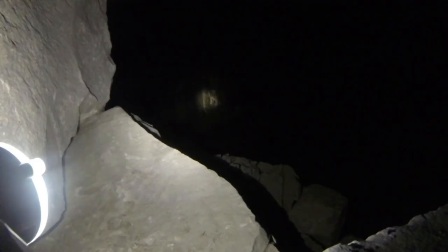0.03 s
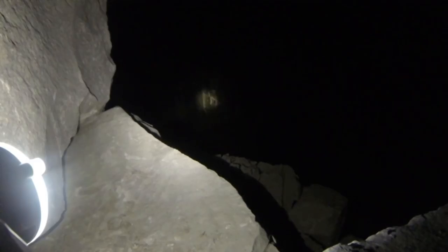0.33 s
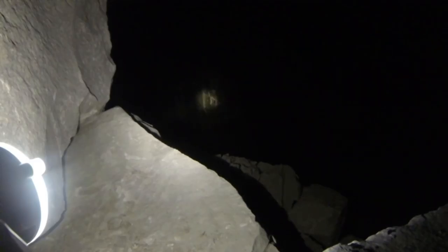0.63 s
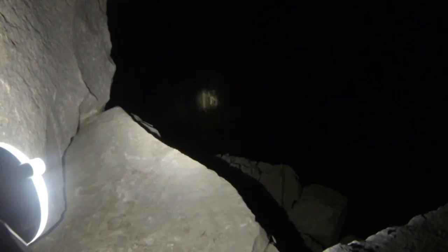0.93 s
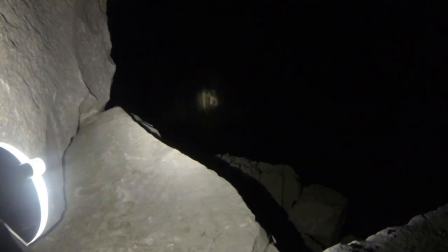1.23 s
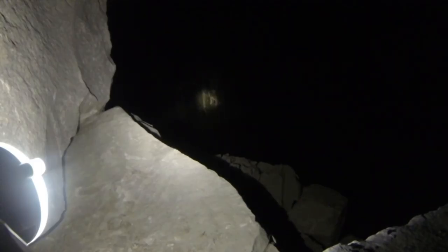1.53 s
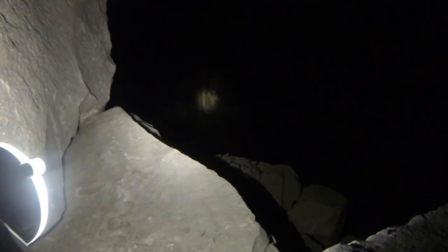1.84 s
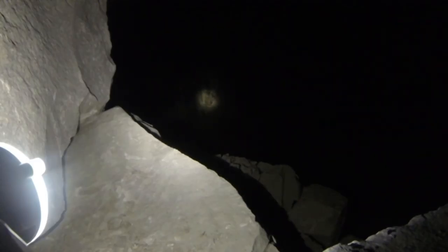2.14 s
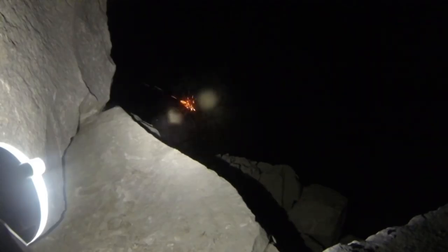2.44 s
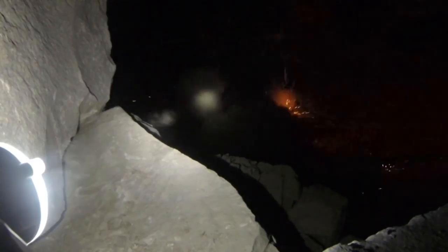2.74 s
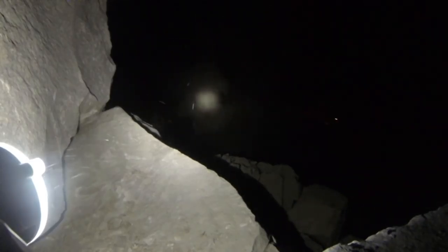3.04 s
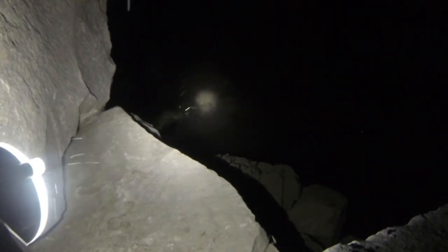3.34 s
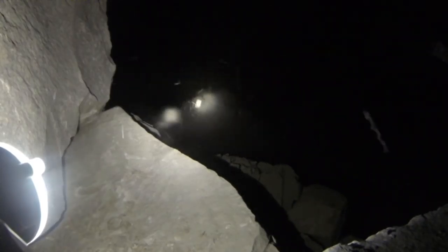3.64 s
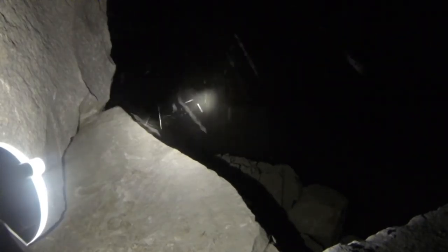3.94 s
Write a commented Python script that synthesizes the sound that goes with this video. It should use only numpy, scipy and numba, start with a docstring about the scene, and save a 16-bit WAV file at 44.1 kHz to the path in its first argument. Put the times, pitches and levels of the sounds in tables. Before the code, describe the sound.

After near silence, a quick string of blasting charges cracks and booms through a rock tunnel.

```python
"""A round of delayed charges fired in a rock tunnel, heard from a camera in a housing behind boulders.
Out of still air, each charge sends a pressure front, a crack of wall reflections, a boom and a long tail.
The rock heaves and rumbles, loose rock knocks, and the tunnel rings low just after some charges.
Gas and broken rock rush out of the face, fragments strike the housing, and the recorder limits and clips."""
import sys
import numpy as np
from scipy import signal
from scipy.fft import rfft, irfft
from scipy.io import wavfile
from scipy.ndimage import uniform_filter1d
from numba import njit

SR = 44100
rng = np.random.default_rng(int(sys.argv[2]) if len(sys.argv) > 2 else 0)


def log_audio(samples):
    """Write samples as a 16-bit WAV file to the path given in sys.argv[1]."""
    # one column per channel
    frames = np.atleast_2d(samples).T
    # limit to full scale, then quantise
    limited = np.clip(frames, -1, 1)
    pcm = np.round(limited * 32767).astype(np.int16)
    wavfile.write(sys.argv[1], SR, pcm)


N = 176400
T = np.arange(N) / SR
AIR_DB = -4  # trim on the tunnel's echoes and the hiss of the gas
KNOCK_RISE_S, TOP_HZ = 0.002, 15300  # attack of clatters, low rings and jolts; top of the recorder's band


def undb(db):
    """Decibels to gain."""
    return 10 ** (np.asarray(db) / 20)


def unit(x):
    """Scale to rms 1."""
    return x / np.sqrt(np.mean(x ** 2))


def colour(x, spectrum):
    """Shape by a spectrum that rolls off past both ends, at rms 1."""
    hz, db = np.array(spectrum).T
    f = np.maximum(np.arange(N // 2 + 1) * SR / N, 1)
    rolloff = np.minimum(hz[-1] / f, 1) ** 2 * np.minimum(f / hz[0], 1)
    gain = undb(np.interp(np.log(f), np.log(hz), db))
    return unit(irfft(rfft(x) * rolloff * gain, N))


def noise(spectrum):
    """Noise with the given spectrum."""
    return colour(rng.standard_normal(N), spectrum)


def steady(x, span_s):
    """Even out the slow swells of a noise."""
    return x / np.sqrt(uniform_filter1d(x ** 2, max(int(span_s * SR), 2)) + 1e-9)


def burst(start_s, rise_s, fall_s):
    """Fast attack and exponential release."""
    age = np.maximum(T - start_s, 0)
    return (1 - np.exp(-age / rise_s)) * np.exp(-np.minimum(age / fall_s, 50))


# Room tone and hiss at the microphone: freq_hz, level_db
ROOM_TONE = [(20, 0), (60, -3), (150, -6), (400, -13), (1000, -17), (2300, -22), (3800, -24.5), (8000, -30),
             (12000, -33.5), (16000, -33)]
# Faint whine inside the camera: pitch_hz, level_db, pulse_depth (0-1)
WHINE_TONES = [(8420, -85.5, .95), (14745, -86, .55)]

def air_and_electronics(pulse_hz=62.5, buzz_hz=3030, buzz_width_hz=170, start_s=0.065):
    """Still tunnel air, with the hiss, pulsing whine and buzz of the electronics."""
    pulse = .5 + .5 * np.cos(2 * np.pi * pulse_hz * T)
    whine = 0
    for hz, db, depth in WHINE_TONES:
        flutter = unit(1 - depth + depth * pulse ** 2)
        whine += undb(db) * np.sqrt(2) * flutter * np.sin(2 * np.pi * hz * T)
    resonance = signal.iirpeak(buzz_hz, buzz_hz / buzz_width_hz, fs=SR)
    band = signal.lfilter(*resonance, rng.standard_normal(N))
    buzz = undb(-77) * unit(band * (2 * pulse - 1) ** 2)  # swells twice per pulse
    fade_in = np.clip((T - start_s) / .005, 0, 1)
    return (undb(-66) * noise(ROOM_TONE) + whine + buzz) * fade_in


# Course of the deep rumble filling the tunnel: time_s, level_db
RUMBLE_LEVELS = [(1.45, -89), (1.76, -71), (1.83, -16.5), (1.92, -22), (2.0, -33.5), (2.19, -28),
                 (2.27, -19.5), (2.52, -30.5), (2.63, -21.5), (2.74, -29), (2.87, -21), (3.09, -31.5),
                 (3.2, -19), (3.36, -40.5), (3.45, -30), (3.55, -20.5), (3.71, -36.5), (3.88, -25),
                 (4.0, -32)]
# Its spectrum: freq_hz, level_db
RUMBLE_SPECTRUM = [(12, -22), (28, -0.5), (55, 4), (85, 0), (130, -8.5), (200, -15.5), (330, -24),
                   (700, -63)]
# Shocks reaching the camera through the rock: peak_s, level_db, pitch_hz, swell_s, fall_s
ROCK_SHOCKS = [(1.811, -4.5, 62, 0.012, 0.017), (2.329, -5.5, 60.5, 0.0098, 0.02),
               (2.436, -15, 47.7, 0.011, 0.034), (2.593, -30, 62, 0.014, 0.051),
               (2.779, -14, 46.6, 0.0055, .04), (2.954, -16, 57.6, 0.017, 0.02),
               (3.18, -14.5, 34.7, 0.019, 0.017), (3.778, -13, 43.3, 0.0068, 0.031)]

def heaving_rock():
    """The rock heaves in a few slow cycles, over the rumble of the tunnel's air."""
    rumble_db = np.interp(T, *np.array(RUMBLE_LEVELS).T)
    sound = undb(rumble_db) * steady(noise(RUMBLE_SPECTRUM), span_s=0.05)
    for peak_s, db, hz, swell_s, fall_s in ROCK_SHOCKS:
        age = T - peak_s
        decay = np.where(age < 0, (age / swell_s) ** 2 / 2, age / fall_s)
        sound -= undb(db) * np.cos(2 * np.pi * hz * age) * np.exp(-np.minimum(decay, 50))
    return sound


# Clatters and low rings in the tunnel: start_s, clatter_db, clatter_fall_s, ring_db, ring_hz
CLATTERS_AND_RINGS = [ (1.7965, -34, .007, -50, 150), (1.911, -30, 0.0071, -21.5, 138),
                      (2.022, -32, 0.0076, -18.5, 334), (2.253, -21.5, 0.0087, -16.5, 183),
                      (2.692, -31, 0.0089, -29, 191), (2.786, -45, 0.0076, -23, 196),
                      (2.939, -29, .012, -19, 143), (3.480, -31, .022, -24, 190),
                      (3.638, -29.5, 0.018, -35, 206), (3.870, -41, 0.0093, -29, 170)]
# The clatter at the microphone: freq_hz, level_db
CLATTER_SPECTRUM = [(300, -7), (700, -3), (1300, 0), (2300, -4), (3500, -16), (5000, -30), (8000, -48)]

def clatters_and_rings(ring_fall_s=0.018):
    """Short clatters and hollow low rings: loose rock knocking, the tunnel ringing just after a charge."""
    clatter, sound = noise(CLATTER_SPECTRUM), np.zeros(N)
    for start_s, clatter_db, fall_s, ring_db, hz in CLATTERS_AND_RINGS:
        ring = np.sin(2 * np.pi * hz * (T - start_s))
        sound += undb(clatter_db) * clatter * burst(start_s, KNOCK_RISE_S, fall_s)
        sound += undb(ring_db) * ring * burst(start_s, KNOCK_RISE_S, ring_fall_s)
    return sound


# Wall crack, boom, early echoes and tail, from behind the boulders: freq_hz, level_db
CRACK_SPECTRUM = [(120, -60.5), (350, -1), (1000, 2.5), (2200, -8), (4000, -7), (6500, -22.5),
                  (9000, -27.5), (12500, -42), (15500, -40)]
BOOM_SPECTRUM = [(40, 8), (110, -1), (190, 7.5), (350, -0.5), (600, -4.5), (1500, -57)]
EARLY_SPECTRUM = [(200, -13), (500, 3), (1100, 10), (2200, 1.5), (3500, -4), (7000, -19.5), (10000, -32.5),
                  (15000, -31)]
TAIL_SPECTRUM = [(60, 4), (140, 4), (195, 9.5), (270, 0.5), (550, 2), (1000, -1.5), (1600, -1),
                 (2200, -10.5), (4000, -13.5), (6500, -27), (9000, -36.5), (12500, -40.5), (15000, -45)]
# The round at the face: start_s, front_db, front_ms, crack_db, crack_fall_s, boom_db, tail_db
ROUND = [ (1.817, -15, 2.9, -31, 0.049, -22, -45), (1.8262, -2, 2.2, -12.5, 0.0044, -17, -29),
         (2.0117, -11.5, 0.61, -24.5, 0.0085, -14.5, -40), (2.1224, -15.5, 1.6, -15, 0.014, -10, -25),
         (2.2436, -7.5, 2.9, -16.5, 0.013, -14.5, -31.5), (2.3270, 0, 2.3, 0.5, 0.0033, -16, -26.5),
         (2.5360, -7, 0.47, -10.5, 0.0049, -28, -33.5), (2.5854, -1.5, 4.6, -24.5, 0.002, -19.5, -54),
         (2.829, -2.5, 1.74, -11.5, 0.0031, -25, -30), (3.1462, -7.5, 2.8, -37.5, .008, -26.5, -39),
         (3.5108, 1.5, 1.45, -4, 0.0047, -21, -29.5), (3.5376, -3.5, 1.3, -12.5, 0.0057, -44, -52),
         (3.9022, -19.5, 0.66, -12, 0.0012, -11.5, -51), (3.9071, 5, 1.76, -2, 0.0035, -16, -29),
         (3.9905, -3.5, 3.5, -11.5, 0.0017, -10.5, -35)]

def charges(suction_damping=2.3, base_edge_hz=3800, early_over_tail_db=10.5):
    """Each charge: a front with its longer suction, a crack off the walls, a boom, echoes that dull."""
    fronts, crack_power, boom_power, tail_power, early_power = np.zeros((5, N))
    for start_s, front_db, front_ms, crack_db, crack_fall_s, boom_db, tail_db in ROUND:
        progress = np.clip((T - start_s) / (4 * front_ms / 1000), 0, 1)  # 1 part front, 3 suction
        wave = np.sin(2 * np.pi * np.sqrt(progress)) * np.exp(-suction_damping * progress)
        # The harder the crack, the steeper the front.
        edge_hz = min(base_edge_hz * undb(0.66 * (crack_db - front_db)), TOP_HZ)
        fronts -= undb(front_db) * signal.lfilter(*signal.butter(2, edge_hz, fs=SR), wave)
        crack_power += (undb(crack_db) * burst(start_s, rise_s=0.00093, fall_s=crack_fall_s)) ** 2
        boom_power += (undb(boom_db) * burst(start_s, rise_s=0.0025, fall_s=0.02)) ** 2
        tail_power += (undb(tail_db) * burst(start_s, rise_s=0.0063, fall_s=0.21)) ** 2
        early_db = tail_db + early_over_tail_db
        early_power += (undb(early_db) * burst(start_s, rise_s=0.00093, fall_s=0.025)) ** 2
    tails = np.sqrt(tail_power) * noise(TAIL_SPECTRUM)
    early_echoes = np.sqrt(early_power) * noise(EARLY_SPECTRUM)
    cracks = np.sqrt(crack_power) * steady(noise(CRACK_SPECTRUM), span_s=0.0046)
    booms = np.sqrt(boom_power) * steady(noise(BOOM_SPECTRUM), span_s=0.0081)
    return fronts + cracks + booms + undb(AIR_DB) * (early_echoes + tails)


# Gas and broken rock, down the tunnel at the face: peak_s, level_db, swell_s, fall_s
GAS_SWELLS = [(2.887, -24.5, 0.031, 0.089), (2.964, -23, 0.027, 0.083), (3.19, -22.5, 0.021, 0.065),
              (3.234, -25.5, 0.015, 0.019), (3.625, -30.5, 0.08, 0.064), (3.83, -40.5, 0.048, 0.24)]
# Their hiss: freq_hz, level_db
SPRAY_SPECTRUM = [(80, 7), (200, -1.5), (550, -0.5), (1000, 3), (2200, -4.5), (4000, -12.5), (6500, -22),
                  (9000, -34), (12500, -32), (15000, -40)]

def gas_rushes(grains_per_s=700, grain_spread_db=3.5, bass_db=-3.5):
    """Gas and grit pour out of the face in swells."""
    power = np.zeros(N)
    for peak_s, db, swell_s, fall_s in GAS_SWELLS:
        age = T - peak_s
        decay = np.where(age < 0, (age / swell_s) ** 2, 2 * age / fall_s)
        power += undb(db) ** 2 * np.exp(-np.minimum(decay, 50))
    grains = (rng.random(N) < grains_per_s / SR) * rng.standard_normal(N)
    grains *= undb(grain_spread_db * np.minimum(rng.exponential(size=N), 4))
    hiss = noise(SPRAY_SPECTRUM) + undb(-9) * colour(grains, CRACK_SPECTRUM)
    return np.sqrt(power) * (undb(AIR_DB) * hiss + undb(bass_db) * noise(BOOM_SPECTRUM))


# Hits on the housing, right at the microphone: start_s, ring_db, contact_s, t60_share, tick_db, jolt_db
FRAGMENT_HITS = [(3.3284, -3, 0.00058, 0.5, -18, -23.5), (3.3314, -3.5, 0.0012, 0.9, -36, -50),
                 (3.4240, 7.5, 0.00026, 0.2, -13.5, -21)]
# Ring of the struck housing: pitch_hz, level_db, t60_s
HOUSING_MODES = [(1260, -31, 0.019), (1528, 2.5, 0.04), (1885, -7.5, 0.025), (2275, -9, 0.03),
                 (3250, -21, 0.027), (4500, -29, .03), (5950, -34, 0.013)]
# Tick of the contact: freq_hz, level_db
TICK_SPECTRUM = [(500, -15), (1500, -12), (3500, 7), (7000, -4), (10000, -8.5), (15000, -23)]

def fragments(jolt_hz=200, low_cut_hz=1190):
    """Flying fragments tick on the housing, ring its modes and jolt it on its mount."""
    strikes, jolts, tick = np.zeros(N), np.zeros(N), noise(TICK_SPECTRUM)
    for start_s, ring_db, contact_s, t60_share, tick_db, jolt_db in FRAGMENT_HITS:
        age = np.maximum(T - start_s, 0)
        for hz, mode_db, t60_s in HOUSING_MODES:
            envelope = burst(start_s, contact_s, fall_s=t60_s * t60_share / np.log(1000))
            strikes += undb(ring_db + mode_db) * np.sin(2 * np.pi * hz * age) * envelope
        strikes += undb(tick_db) * tick * burst(start_s, contact_s, fall_s=0.0015)
        sway = np.sin(2 * np.pi * jolt_hz * age)
        jolts += undb(jolt_db) * sway * burst(start_s, KNOCK_RISE_S, fall_s=0.015)
    low_cut = signal.butter(4, low_cut_hz, "high", fs=SR, output="sos")
    return signal.sosfilt(low_cut, strikes) + jolts


# Colour of the case around the microphone: centre_hz, width_hz, gain_db
HOUSING_BANDS = [(660, 210, -2.5), (1453, 197, 8), (1686, 243, 10.5), (2950, 770, 9), (4500, 510, -0.5),
                 (4913, 190, 9.5), (5245, 160, 6), (6200, 300, 6.5), (7500, 1070, 9.5), (8220, 470, 5.5),
                 (10230, 1700, 7.5)]

def housing(x):
    """The case resonates, colouring the sound that passes through it: one bell filter a band."""
    for hz, width_hz, db in HOUSING_BANDS:
        angle = 2 * np.pi * hz / SR
        alpha, gain = np.sin(angle) * width_hz / hz / 2, undb(db / 2)
        feedforward = [1 + alpha * gain, -2 * np.cos(angle), 1 - alpha * gain]
        feedback = [1 + alpha / gain, -2 * np.cos(angle), 1 - alpha / gain]
        x = signal.lfilter(feedforward, feedback, x)
    return x


def scene():
    """One microphone behind the boulders; its case colours the blasts, gas, clatters and low rings."""
    through_case = housing(charges() + gas_rushes() + clatters_and_rings())
    return (through_case + heaving_rock() + fragments() + air_and_electronics())[None]


@njit
def follow(x, attack_s, release_s):
    """Level detector with separate attack and release."""
    attack, release = 1 / (1 + attack_s * SR), 1 / (1 + release_s * SR)
    levels, level = np.empty(len(x)), 0.
    for i in range(len(x)):
        level += (x[i] - level) * (attack if x[i] > level else release)
        levels[i] = level
    return levels


def record(dry):
    """The camera's limiter ducks after the loudest peaks; what slips through clips; the top is cut."""
    threshold = undb(-7.5)
    level = follow(np.abs(dry[0]), attack_s=0.0019, release_s=0.096)
    limited = dry / np.maximum(level / threshold, 1)
    high_cut = signal.ellip(8, .2, 70, TOP_HZ, fs=SR, output="sos")
    return signal.sosfilt(high_cut, np.clip(limited, -1, 1))


dry = scene()
out = record(dry)
log_audio(out)
```